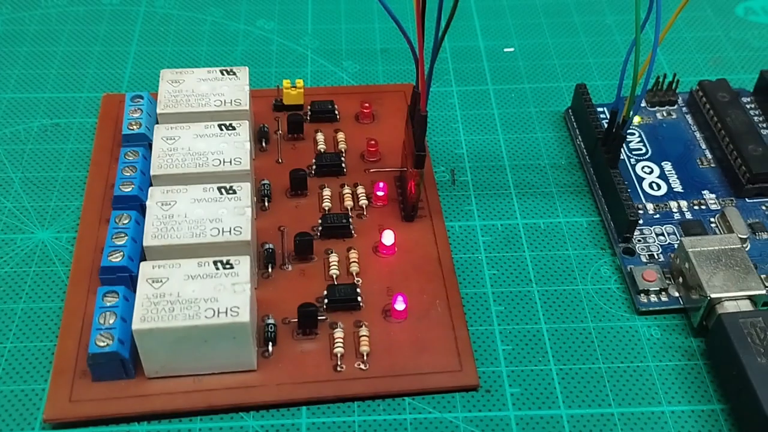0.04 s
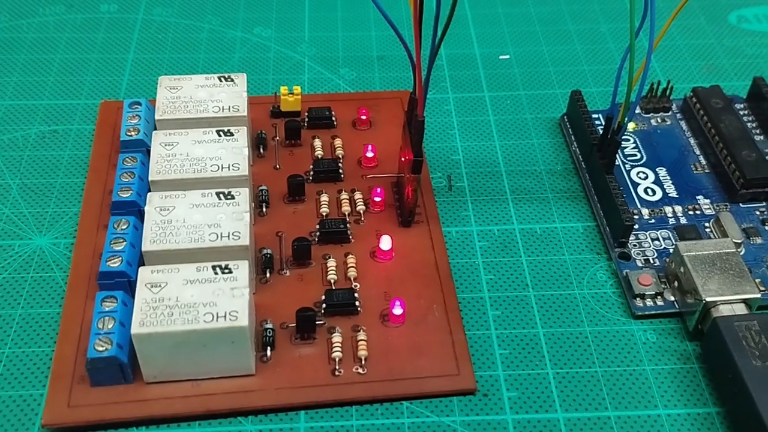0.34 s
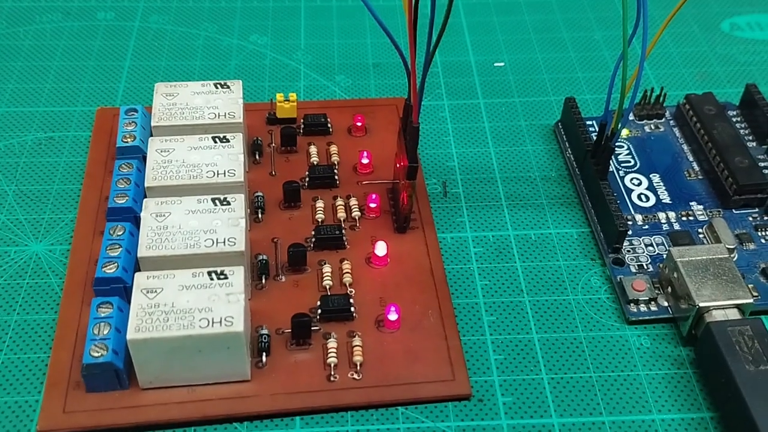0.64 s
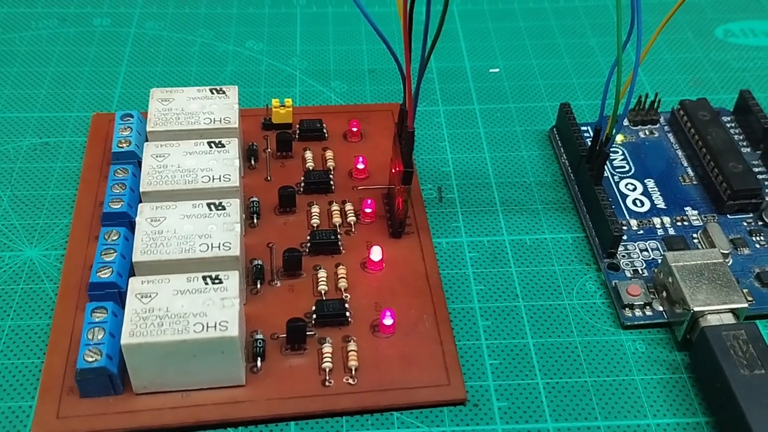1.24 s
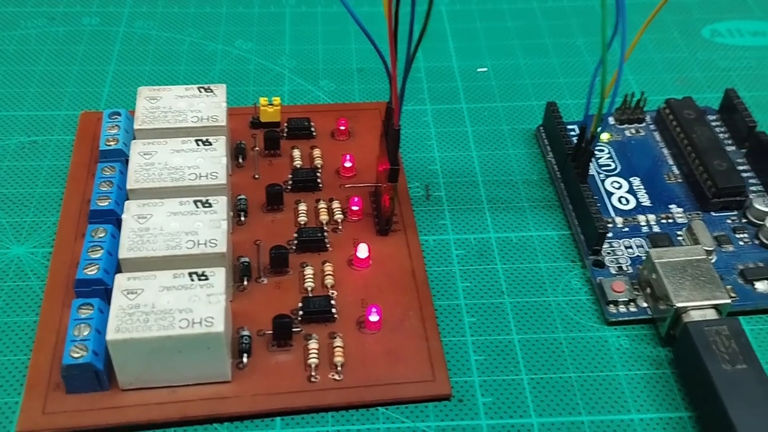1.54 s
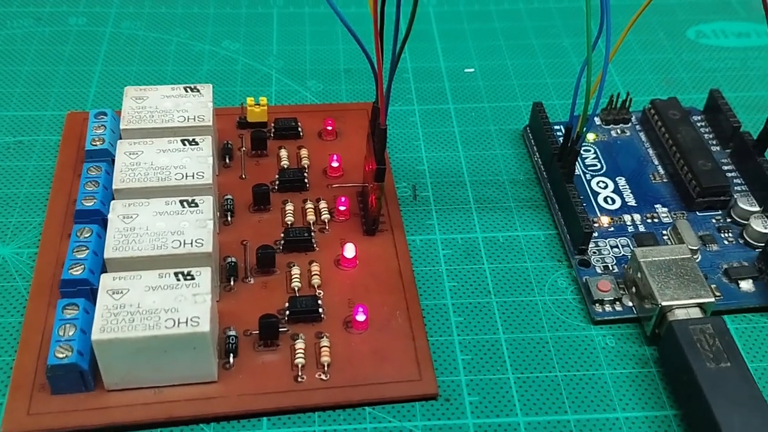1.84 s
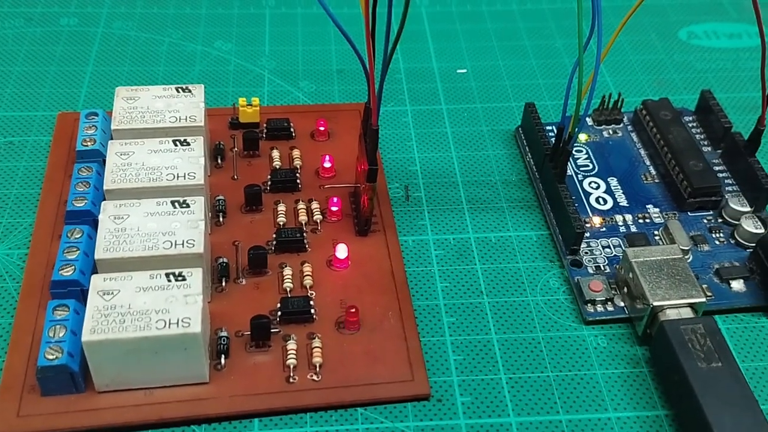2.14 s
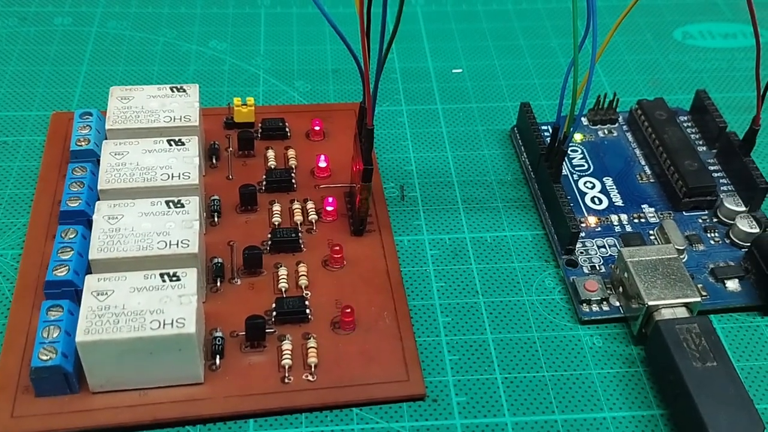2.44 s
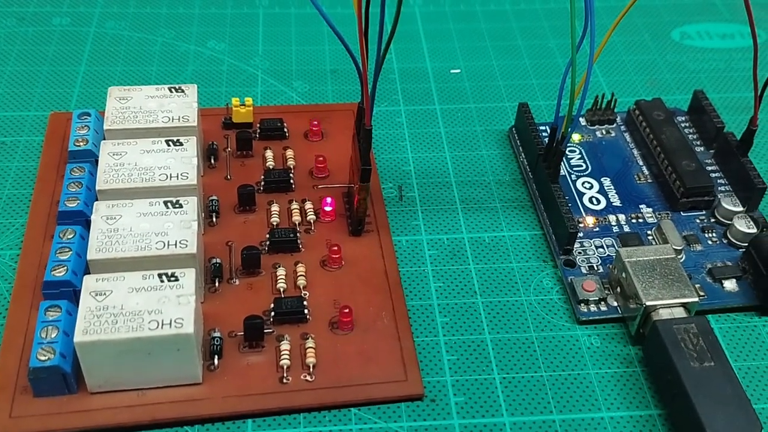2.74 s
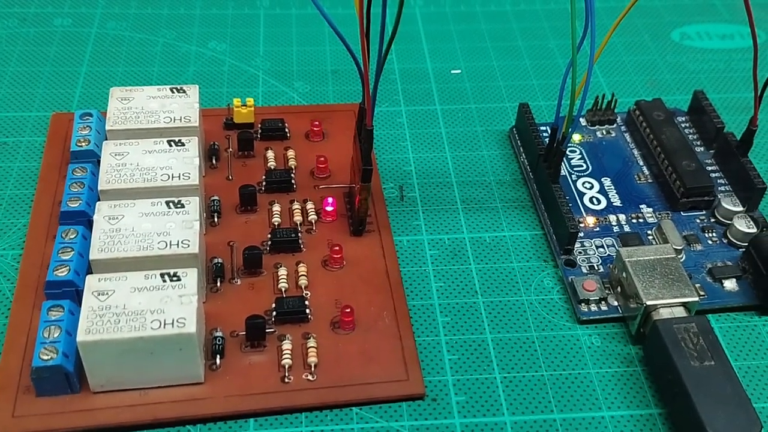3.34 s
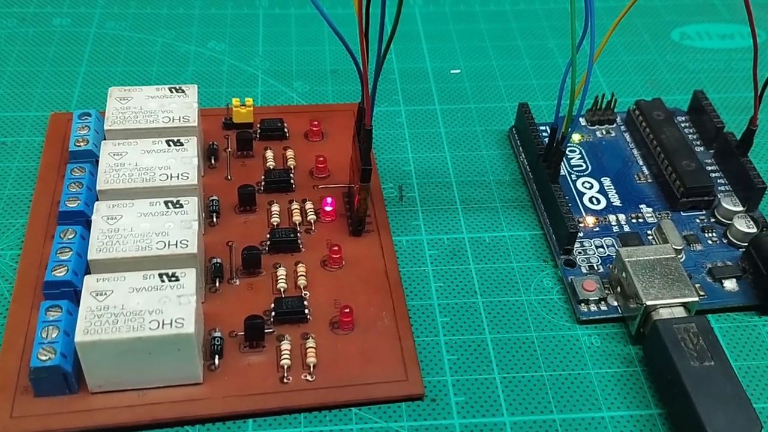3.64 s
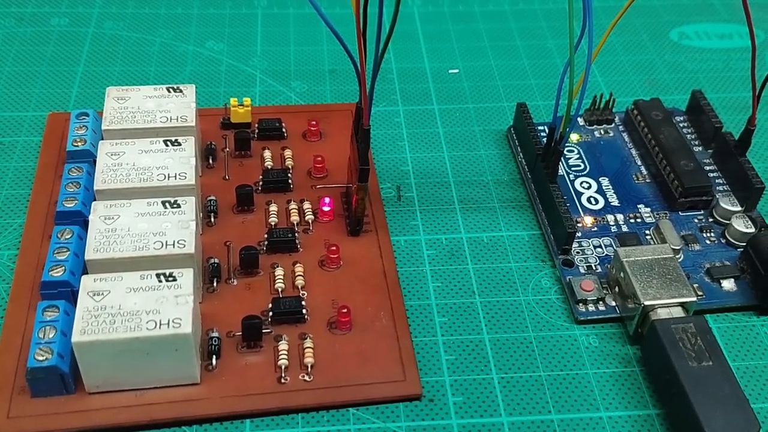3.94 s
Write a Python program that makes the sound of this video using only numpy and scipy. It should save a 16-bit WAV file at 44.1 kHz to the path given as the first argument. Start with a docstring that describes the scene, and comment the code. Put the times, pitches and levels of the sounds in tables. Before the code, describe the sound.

Electrical relays on a small circuit board click sharply in a quick run, pause for nearly two seconds, then click four more times at the same pace. The microphone is close, in a small dry room with faint rumble and hiss.

```python
"""A small dry room, a stereo microphone close to a circuit board; low rumble, faint hum and hiss throughout.
We come in on the tail of one relay click and two more follow, a fifth of a second apart: each armature
hits its stop and chatters for a few milliseconds at most, ringing frame and plastic case and nudging
the board. After a pause of nearly two seconds, four relays switch in turn at the same pace.
The last second is room tone alone."""
import sys
import numpy as np
from scipy import signal
from scipy.fft import rfft, irfft, next_fast_len
from scipy.io import wavfile
from scipy.ndimage import uniform_filter1d

SR = 44100
rng = np.random.default_rng(int(sys.argv[2]) if len(sys.argv) > 2 else 0)


def unload_wav(signal):
    """Save mono or channel-first audio to the path in sys.argv[1] as 16-bit WAV at rate SR, clipped to [-1, 1]."""
    wavfile.write(
        sys.argv[1],
        SR,
        np.round(np.clip(np.atleast_2d(signal).T, -1, 1) * 32767).astype(np.int16),
    )


N = 176400


def undb(db):
    """Decibels to gain."""
    return 10 ** (np.asarray(db) / 20)


def level(x, db):
    """Scale to an rms level."""
    return x * undb(db) / np.sqrt(np.mean(x ** 2))


def colour(x, points, share=1):
    """Filter by (Hz, dB) points, or by a share of their decibels."""
    hz, db = np.array(points, float).T
    bin_hz = np.maximum(np.fft.rfftfreq(len(x), 1 / SR), 1)
    curve_db = np.interp(np.log(bin_hz), np.log(hz), db)
    return irfft(rfft(x) * undb(share * curve_db), len(x))


def cut(x, hz, kind, order):
    """Butterworth high-pass or low-pass."""
    return signal.sosfilt(signal.butter(order, hz, kind, fs=SR, output="sos"), x)


def wander(rate_hz):
    """Smooth random drift with an rms of 1."""
    hold = int(SR / rate_hz)
    steps = np.repeat(rng.standard_normal(N // hold + 1), hold)
    smooth = uniform_filter1d(uniform_filter1d(steps, hold), hold)
    return level(smooth[:N], 0)


# Room rumble at the microphone (frequency [Hz], relative density [dB])
RUMBLE_SPECTRUM = [(10, -11), (22, 1), (36, -3), (50, -10.5), (74, -20), (100, -13.5), (135, -19),
                   (185, -24.5), (230, -21.5), (340, -23.5), (450, -31), (580, -33.5), (900, -46.5),
                   (1300, -71)]
# Its stereo width (frequency [Hz], side minus mid [dB])
RUMBLE_WIDTH = [(35, -12), (90, -8.5), (300, -11.5), (800, -1.5)]
# Hum tones in the mid signal (frequency [Hz], level [dB])
HUM_TONES = [(297.4, -65.5), (130.5, -69)]
def room_tone(rumble_db=-49.5, hum_drift=.0039, hum_waver_db=3, pan_left_db=1):
    """Low room noise, nearly alike on both sides, with a hum that wavers in pitch and level."""
    mid, side = (level(colour(rng.standard_normal(N), RUMBLE_SPECTRUM), rumble_db) for _ in range(2))
    side = colour(side, RUMBLE_WIDTH)
    for hz, db in HUM_TONES:
        pitch_hz = hz * (1 + hum_drift * wander(rate_hz=5.996))
        phase = 2 * np.pi * np.cumsum(pitch_hz) / SR
        waver = undb(hum_waver_db * wander(rate_hz=7.6))
        mid = mid + level(np.sin(phase) * waver, db)
    return np.array([mid + side, mid - side]) * undb([[pan_left_db / 2], [-pan_left_db / 2]])


# Self-noise of the microphone (frequency [Hz], relative density [dB])
HISS_SPECTRUM = [(900, 1), (1500, -0.5), (2000, -5), (2600, -5), (3500, -9), (5200, -11.5), (6100, -10.5),
                 (6500, -1.5), (6900, 2), (7200, -7.5), (7800, -24.5), (9000, -19.5), (11500, -20.5),
                 (13200, -13), (15800, -18)]
# Its lean between the channels (frequency [Hz], left minus right [dB])
HISS_LEAN = [(1000, 1), (5000, 0.5), (6800, -6), (9000, 1), (15000, 1)]
def microphone_hiss(hiss_db=-71):
    """The microphone's own steady hiss, unrelated left and right, with a peak near 7 kHz."""
    channels = []
    for share in (.5, -.5):
        hiss = colour(rng.standard_normal(N), HISS_SPECTRUM)
        hiss = cut(hiss, 700, "high", order=2)  # the rumble takes over below
        channels.append(colour(level(hiss, hiss_db), HISS_LEAN, share))
    return cut(np.array(channels), 15900, "low", order=24)


def chatter(t, length_s):
    """A short burst of bounces, of unit energy, that drives all pitches about equally."""
    gate = np.sqrt(np.sin(np.pi * np.minimum(t / length_s, 1)).clip(0))
    burst = rng.standard_normal(len(t)) * gate
    for _ in range(30):  # flatten the spectrum, then confine the burst again
        flat_spectrum = np.exp(1j * np.angle(rfft(burst)))
        burst = irfft(flat_spectrum, len(t)) * gate
    return burst / np.sqrt(np.sum(burst ** 2))


def ring(t, hz, t60):
    """A decaying mode with gain 1 at resonance."""
    decay = np.log(1000) / t60
    return 2 * decay / SR * np.exp(-decay * t) * np.cos(2 * np.pi * hz * t)


# Frame and case modes of each relay, heard close up
# (frequency [Hz], relative level [dB], t60 [s], right minus left [dB], group)
RELAY_MODES = { "first": [(1750, -4.5, .016, -8, "case"), (2470, -8, 0.0082, -4, "case"),
               (2675, 8, 0.019, -16, "clack"), (3970, 8.5, 0.011, -11, "ping"),
               (4760, 1.5, 0.027, -14, "snap"), (5040, 6, 0.048, -16, "snap"),
               (6690, -2, 0.018, -5, "snap"), (8030, -6, .004, -6, "snap"), (12160, 1, 0.012, -17, "tick"),
               (14400, -1, 0.0055, -12, "tick"), (14000, 7, 0.0069, -8, "tick")],
               "second": [(1860, 1.5, 0.011, 0, "case"), (2200, 10, 0.021, -9, "case"),
               (2590, 14.5, 0.025, -12, "clack"), (4000, 17.5, 0.024, -18.5, "ping"),
               (4370, 2, 0.0094, -3, "snap"), (5440, 5.5, 0.01, -16, "snap"),
               (6750, -7, 0.024, -31, "snap"), (7060, 5.5, 0.027, 11, "snap"),
               (11500, -25.5, 0.009, -9, "tick"), (13500, -5, 0.009, 13, "tick"),
               (14400, 6, 0.009, -1.5, "tick")], "third": [(1640, -10.5, 0.021, -15, "case"),
               (2170, -11.5, 0.014, -6, "case"), (2800, 2, 0.01, -9, "clack"),
               (3970, 7, 0.0072, -20, "ping"), (4530, -1.5, 0.036, 4, "snap"),
               (5320, 7, 0.013, -21.5, "snap"), (5900, -11, 0.017, -5, "snap"),
               (6850, -4.5, 0.016, 5.5, "snap"), (9630, -26, 0.0086, -14, "tick"),
               (13900, -4.5, 0.009, 0.5, "tick"), (15100, -10, 0.012, 10, "tick"),
               (14100, -4, 0.012, -5, "tick")], "fourth": [(1625, -3, 0.02, -13, "case"),
               (2705, 4, 0.014, -19, "clack"), (2740, 3.5, 0.023, -7, "clack"),
               (3964, 9.5, 0.015, -22, "ping"), (4640, -5, 0.0085, -9, "snap"),
               (5490, 0, 0.0092, -17, "snap"), (6230, -4, 0.013, -1, "snap"),
               (7140, -31, 0.018, -22, "snap"), (8500, -13, 0.0022, -13, "tick"),
               (12400, -0.5, 0.012, 3, "tick"), (13200, 2, 0.012, -15, "tick"),
               (15000, 5, 0.009, -1, "tick")]}
def relay_click(t, name, chatter_s, rebound_s, rebound_db, group_db):
    """Armature and contacts chatter and rebound, ringing the relay; gives left, right and room feed."""
    tick_share, tick_delay_s, tick_db = .5, .0003, 1  # the contacts meet in a shorter burst
    crack_share, crack_db, ring_db = .29, -5.5, -8  # the room is fed a faster-dying crack and the ring
    drive_db = dict(zip(("case", "clack", "ping", "snap", "tick"), group_db))
    rebound = undb(rebound_db) * np.roll(chatter(t, chatter_s), int(rebound_s * SR))
    armature = chatter(t, chatter_s) + rebound
    tick = np.roll(chatter(t, tick_share * chatter_s), int(tick_delay_s * SR))
    contacts = undb(tick_db) * tick + rebound / 2
    body = 0
    for hz, db, t60, right_db, group in RELAY_MODES[name]:
        mode = ring(t, hz, t60)
        crack = np.sqrt(crack_share) * ring(t, hz, crack_share * t60)
        room_feed = undb(right_db / 2) * (undb(ring_db) * mode + undb(crack_db) * crack)
        paths = undb(db + drive_db[group]) * np.array([mode, undb(right_db) * mode, room_feed])
        force = contacts if group == "tick" else armature
        body = body + signal.fftconvolve(paths, force[None])
    return cut(body, 1486, "high", order=4)  # the small case radiates little bass


# Modes of the circuit board (frequency [Hz], relative level [dB], t60 [s])
BOARD_MODES = [(136, -5.5, 0.058), (314, -3.5, 0.028), (408, -7.5, 0.023), (636, -16.5, 0.017)]
def board_thump(t, thump_db):
    """The armature's push sets the board ringing dully; gives left, right and room feed."""
    push = undb(thump_db) * signal.unit_impulse(len(t))
    modes = sum(undb(db) * ring(t, hz, t60) for hz, db, t60 in BOARD_MODES)
    thump = cut(signal.fftconvolve(modes, push), 860, "low", order=2)
    return thump * undb([[0], [-3], [-3]])  # strongest on the left


# Returns from the desk, the walls and the late room
# (delay [s], build-up [s], t60 [s], relative level [dB])
ROOM_RETURNS = [(.001, 0.0011, 0.028, -11), (.007, 0.0013, 0.093, -12.5), (.02, 0.0084, 0.19, -26)]
# Their tone at the microphone (frequency [Hz], gain [dB])
RETURN_TONE = [(400, 7.5), (1700, 3.5), (2700, 0.5), (4000, -1.5), (4800, 3), (5500, -2.5), (7000, 0.5),
               (9000, -3.5), (12000, -3), (15300, -7.5)]
def room_response():
    """Desk and walls as one channel hears them: diffuse reflections that build up and die away."""
    t = np.arange(SR // 2) / SR
    response = 0
    for delay_s, rise_s, t60, db in ROOM_RETURNS:
        age = np.maximum(t - delay_s, 0)
        envelope = (1 - np.exp(-age / rise_s)) * np.exp(-np.log(1000) * age / t60)
        tail = rng.standard_normal(len(t)) * envelope
        response = response + undb(db) * tail / np.sqrt(np.sum(tail ** 2))
    return colour(response, RETURN_TONE)


# Overall tone of the clicks: dips near 1.2 and 10 kHz, bright top (frequency [Hz], gain [dB])
CLICK_TONE = [(700, -1), (1200, -4), (1600, -0.5), (4000, 0.5), (5000, 0), (7000, -2.5), (8200, 1),
              (9800, -4.5), (11500, 0), (14000, 2.5), (15500, 4)]
# What the right port adds to the reflections (frequency [Hz], gain [dB])
RIGHT_PORT_TONE = [(2500, 0), (4000, -1), (5400, 2), (6800, 4), (8500, -5), (15000, 0.5)]
# The two runs of switchings (time [s], relay, chatter length [s], rebound delay [s], rebound [dB],
# board thump [dB], case [dB], clack [dB], ping [dB], snap [dB], tick [dB])
SWITCHINGS = [(-.036, "second", 0.0013, 0.0026, -4, 1, -19, -12, -2.5, -0.5, 2),
              (0.1646, "third", 0.0034, 0.0019, -13, -6.5, -12.5, 0, 2.5, 4.5, 5.5),
              (.3660, "fourth", .0017, 0.0023, -15, -8.5, -4, -2, 3, 5, 0),
              (2.1643, "first", .0022, .0026, -3.5, 2.5, 0, 0, -0.5, 1.5, -5),
              (2.3648, "second", .0010, 0.0017, -3.5, 4, -7, -2, -4, -1.5, -4),
              (2.564, "third", 0.00113, .0025, -2.5, -1.5, 8, 3.5, -13, -5, 1),
              (2.7645, "fourth", 0.0019, 0.0025, -7, -3.5, 5.5, 1.5, -5.5, 5, -4)]
def relay_runs(right_lag_s=.0002, room_db=1.5):
    """The relays switch close to the microphone, nearer its left port, and the room answers."""
    t = np.arange(next_fast_len(SR // 20)) / SR
    lead = SR // 2  # space for the click that begins before time zero
    paths = np.zeros((3, N + 2 * lead))
    for time_s, name, chatter_s, rebound_s, rebound_db, thump_db, *group_db in SWITCHINGS:
        click = relay_click(t, name, chatter_s, rebound_s, rebound_db, group_db)
        start = lead + int(time_s * SR)
        paths[:, start:start + click.shape[1]] += click + board_thump(t, thump_db)
    left, right, room_feed = (colour(path, CLICK_TONE) for path in paths)
    direct = np.array([left, np.roll(right, int(right_lag_s * SR))])
    responses = np.array([room_response(), colour(room_response(), RIGHT_PORT_TONE)])
    echoes = signal.fftconvolve(room_feed[None], responses)
    return direct[:, lead:lead + N] + undb(room_db) * echoes[:, lead:lead + N]


def scene():
    """Close relays over the quiet room and the microphone's hiss."""
    return relay_runs() + room_tone() + microphone_hiss()


def record(dry):
    """The recorder cuts the treble steeply above 16.6 kHz."""
    return signal.sosfilt(signal.ellip(8, .2, 70, 16600, fs=SR, output="sos"), dry)


dry = scene()
out = record(dry)
unload_wav(out)
```